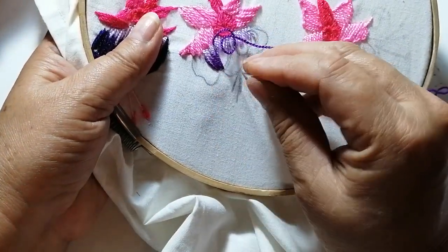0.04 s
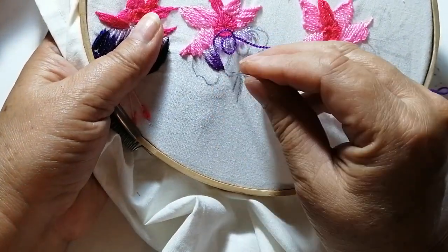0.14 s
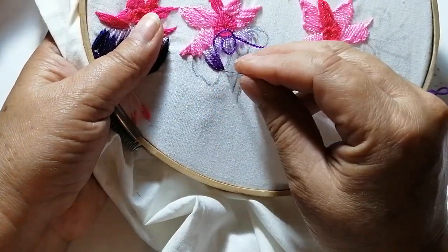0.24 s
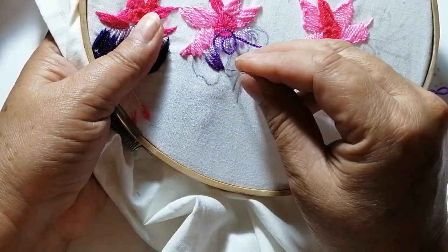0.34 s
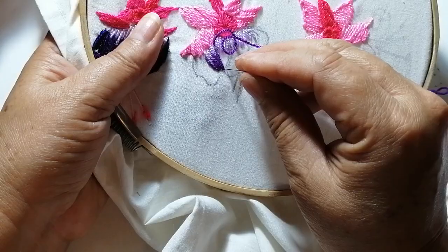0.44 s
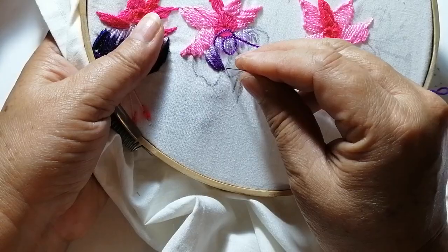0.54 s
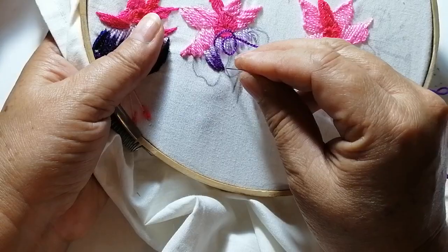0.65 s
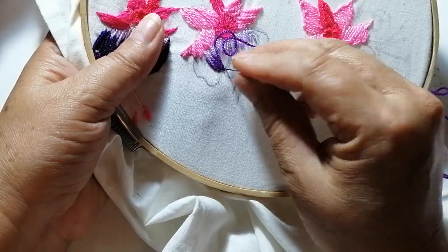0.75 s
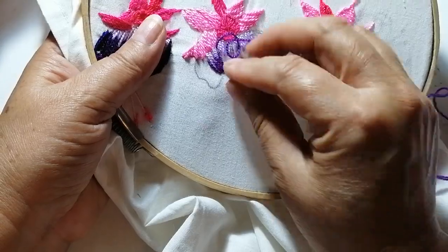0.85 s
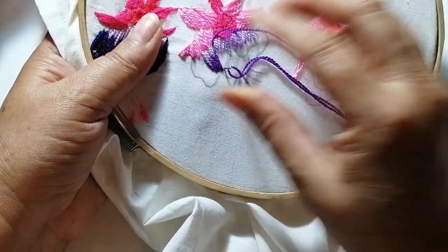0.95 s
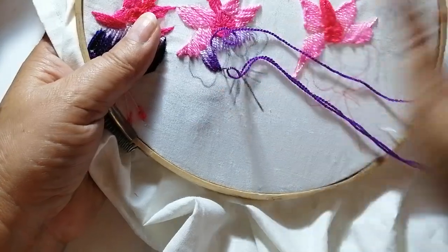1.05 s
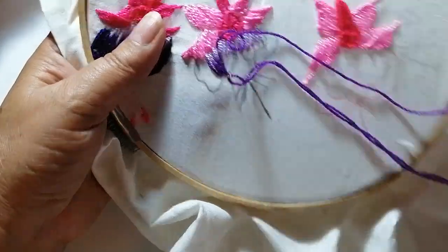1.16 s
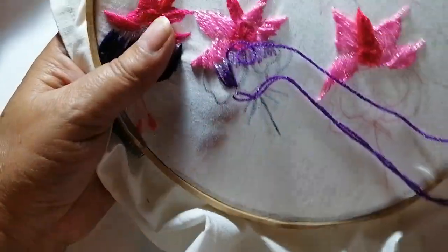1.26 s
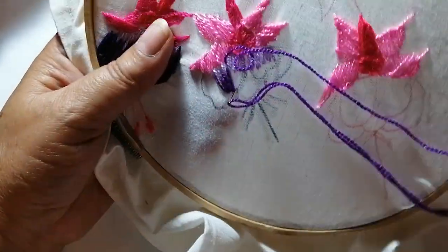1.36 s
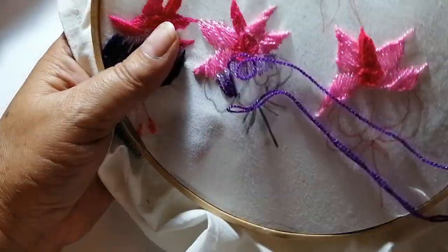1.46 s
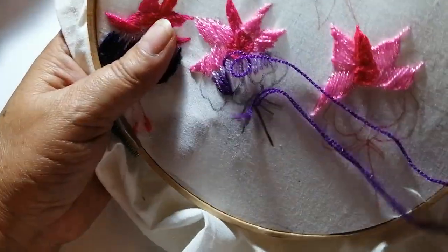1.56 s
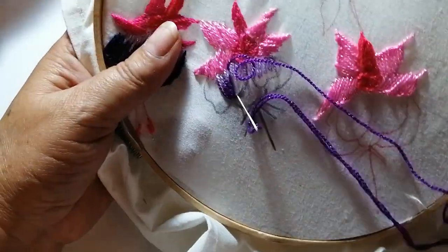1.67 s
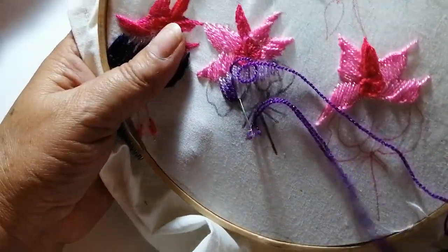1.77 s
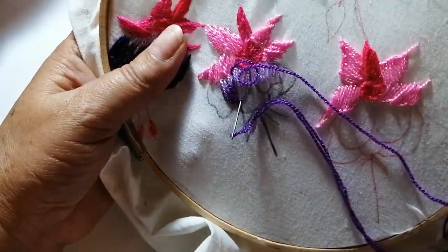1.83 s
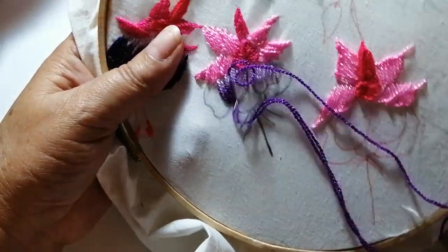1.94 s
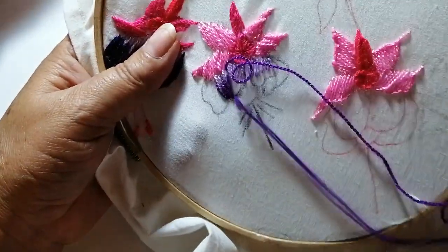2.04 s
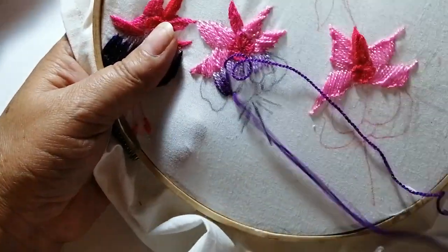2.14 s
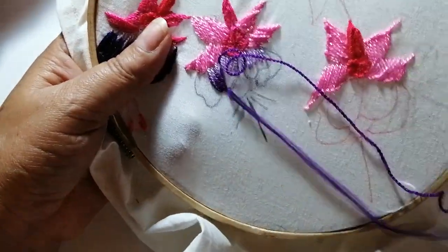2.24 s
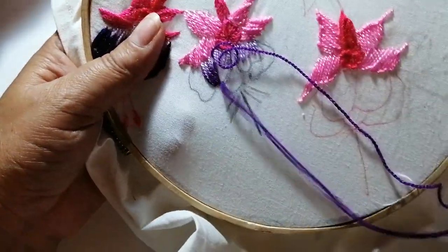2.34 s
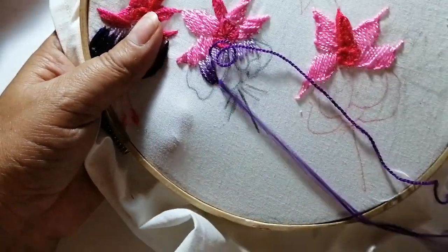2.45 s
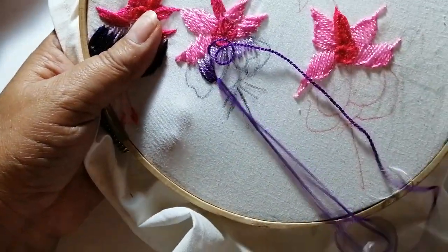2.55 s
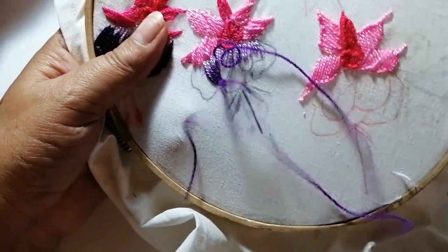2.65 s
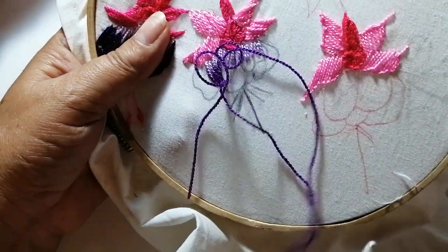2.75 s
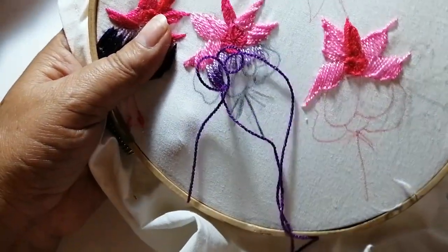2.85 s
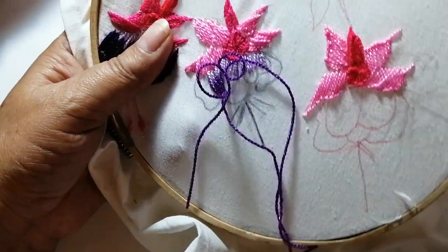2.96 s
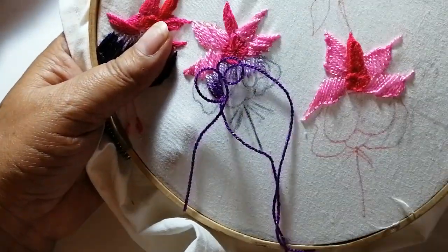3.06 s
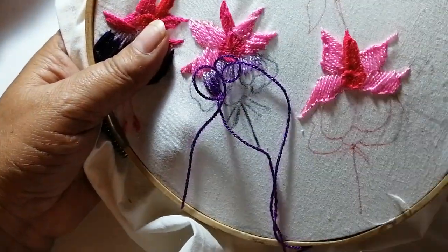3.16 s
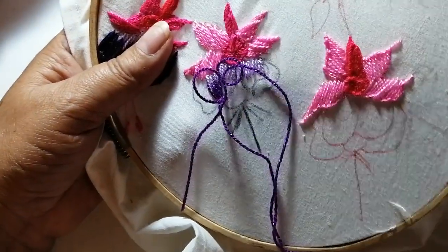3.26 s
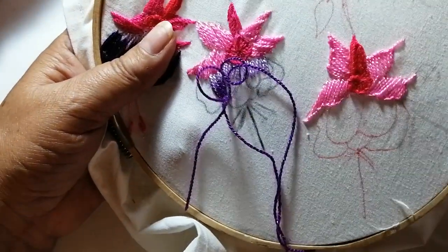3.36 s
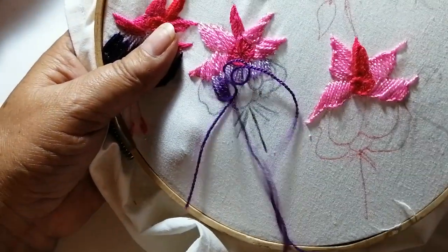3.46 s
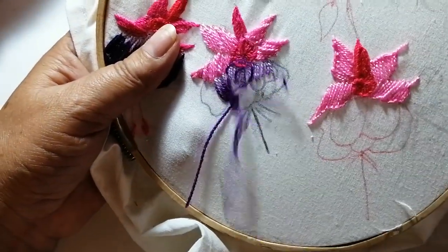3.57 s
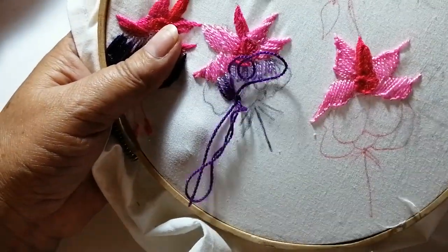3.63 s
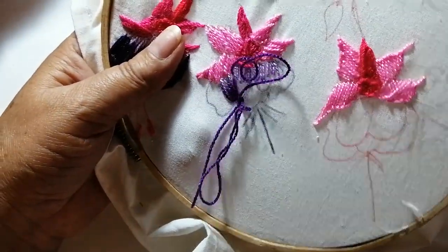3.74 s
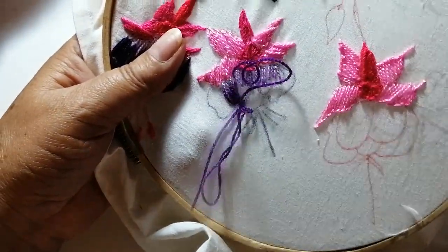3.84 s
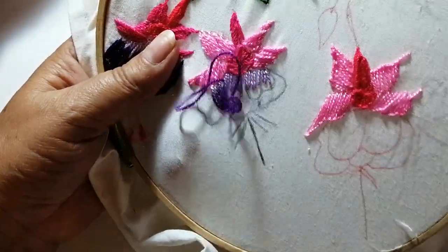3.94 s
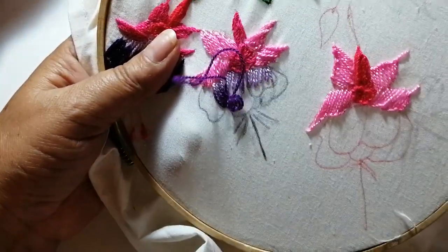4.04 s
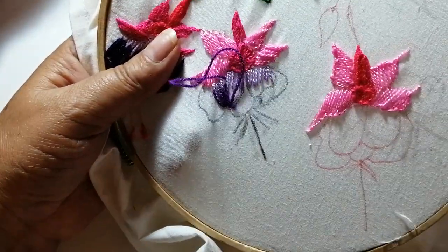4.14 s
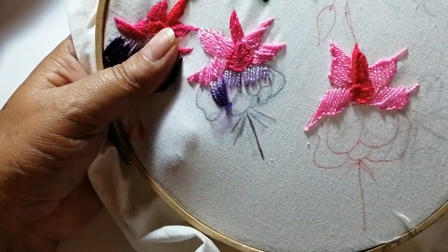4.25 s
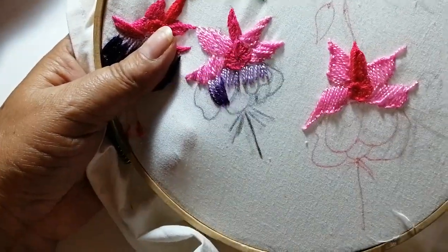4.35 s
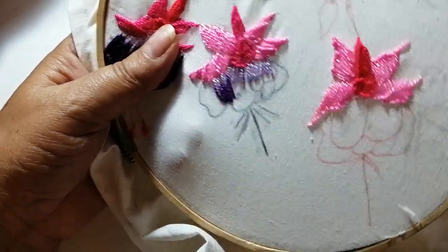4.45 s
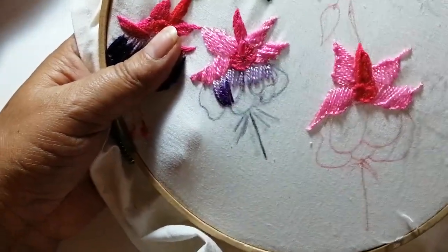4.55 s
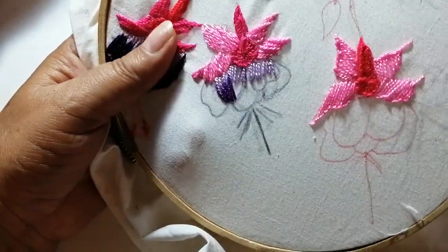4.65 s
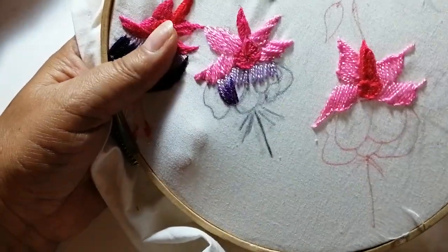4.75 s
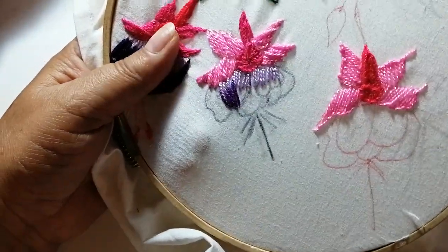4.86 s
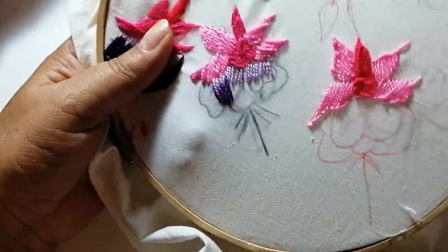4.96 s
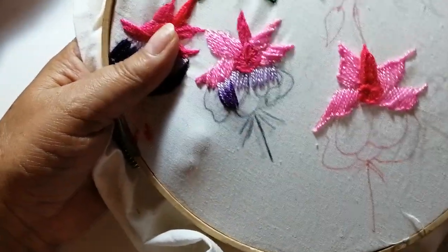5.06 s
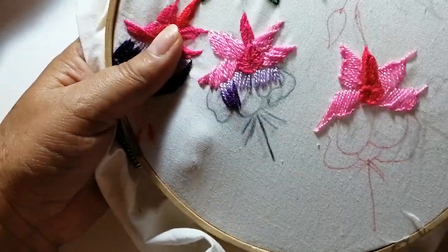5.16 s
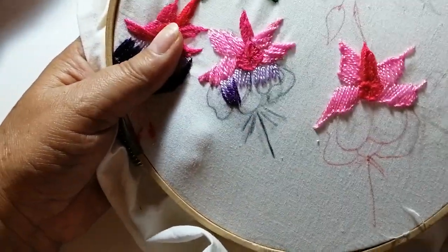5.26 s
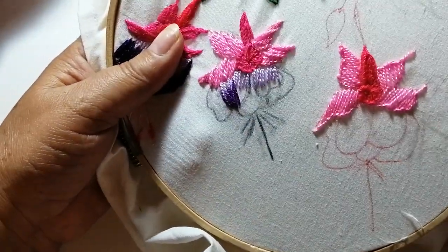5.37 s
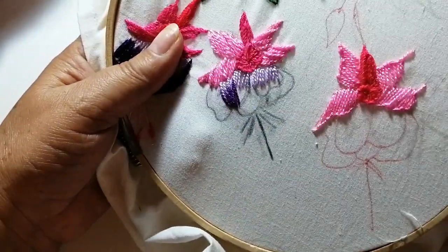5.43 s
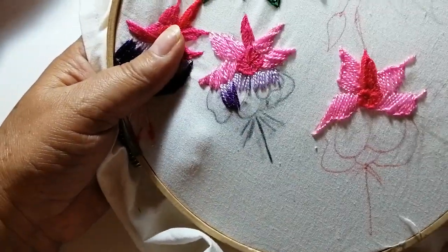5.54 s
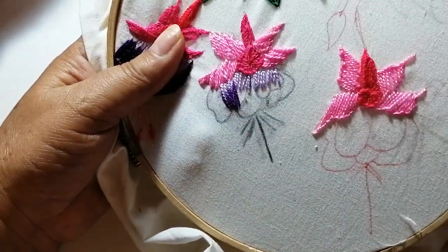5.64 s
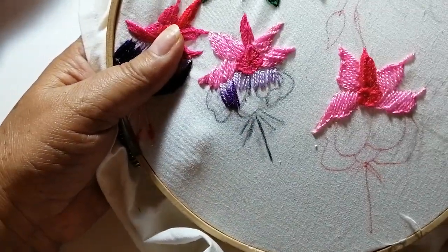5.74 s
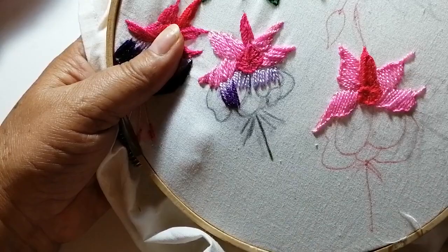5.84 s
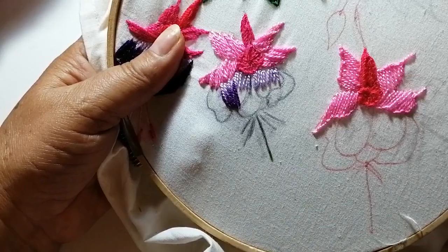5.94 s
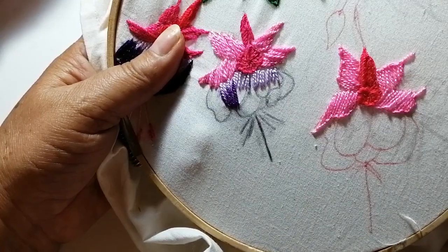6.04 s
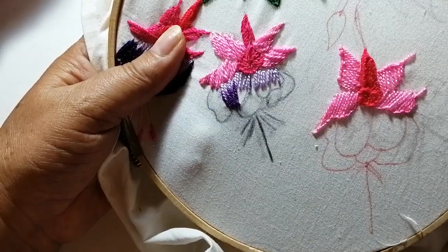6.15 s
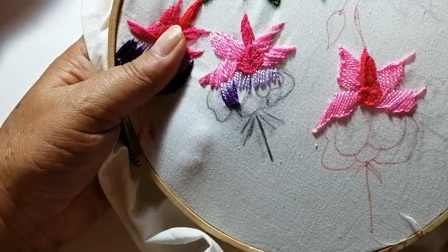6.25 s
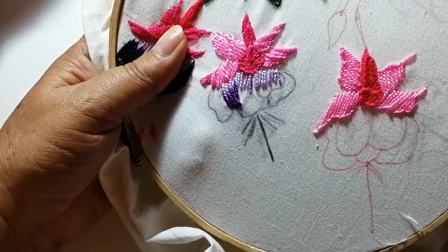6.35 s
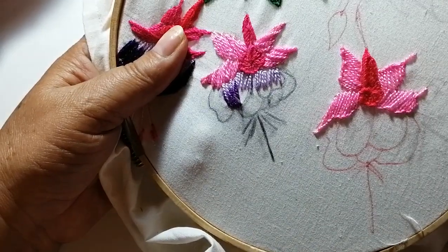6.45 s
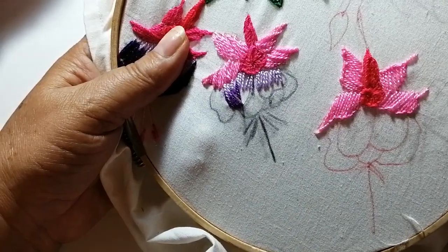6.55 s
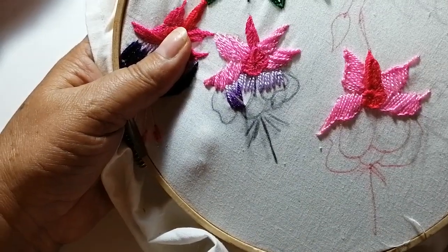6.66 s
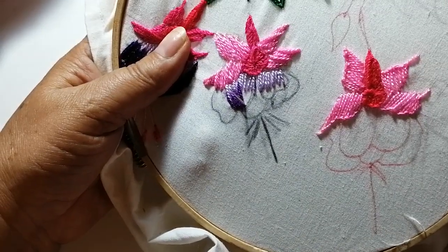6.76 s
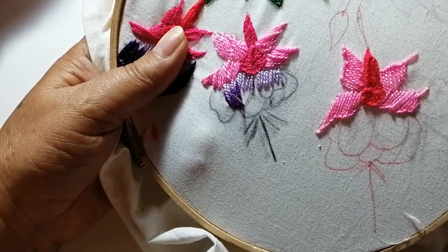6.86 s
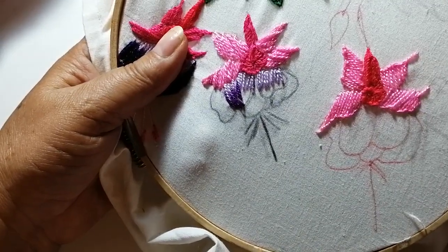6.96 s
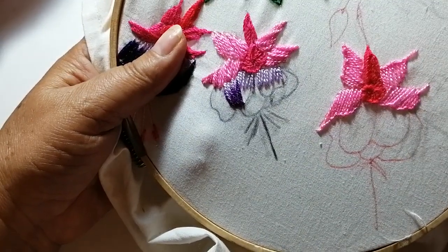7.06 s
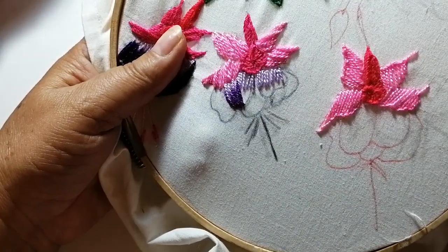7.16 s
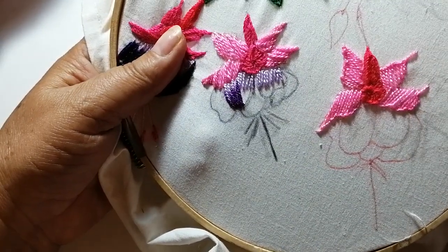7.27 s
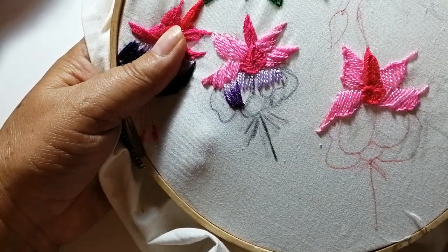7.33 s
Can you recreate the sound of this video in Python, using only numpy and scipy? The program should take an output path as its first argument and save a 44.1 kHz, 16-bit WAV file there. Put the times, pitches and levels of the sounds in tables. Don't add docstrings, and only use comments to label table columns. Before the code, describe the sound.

Very close stereo microphone in a small quiet room. Fingers brush cloth faintly, then a needle pops through fabric stretched in a hoop and thread rasps through for over half a second with a hollow drum-like ring. A shorter second stitch follows, ending in the hardest pop and a dragging thread tail. Later a few tiny crackling snags, then only low motor hum and soft hiss.

```python
import sys
import numpy as np
from scipy import signal
from scipy.fft import rfft, irfft, next_fast_len
from scipy.io import wavfile
from scipy.ndimage import uniform_filter1d

SR = 44100
rng = np.random.default_rng(int(sys.argv[2]) if len(sys.argv) > 2 else 0)


def transcribe(u):
    v = np.clip(np.atleast_2d(u).T, -1, 1)
    q = np.round(v * 32767).astype(np.int16)
    wavfile.write(sys.argv[1], SR, q)


def linear_from_db(decibels):
    return 10 ** (np.asarray(decibels, float) / 20)


N = 326340
TIME = np.arange(N) / SR


def evened(x):
    return x / np.sqrt(np.mean(x ** 2) + 1e-20)


def read(points, hz):
    f, value = np.transpose(points)
    return np.interp(np.log(hz + 1), np.log(f + 1), value)


def ring(modes):
    t = TIME[:8192]
    tap = np.zeros(len(t))
    for hz, width_hz, db in modes:
        decay = np.exp(-np.pi * width_hz * t)
        tap += linear_from_db(db) * width_hz * decay * np.cos(2 * np.pi * hz * t)
    b, a = signal.butter(2, modes[0][0] * 2 / 3, "high", fs=SR)
    tap = signal.lfilter(b, a, tap)
    return tap / np.linalg.norm(tap)


def strike(force, modes, soft_hz, swell_s=0):
    soft = signal.butter(2, min(soft_hz, 20000), fs=SR, output="sos")
    tap = ring(modes)
    if swell_s:
        tap = tap * (1 - np.exp(-(TIME[:len(tap)] / swell_s) ** 2))
    tap = signal.sosfilt(np.vstack([soft, soft]), tap)
    tap /= np.linalg.norm(tap)
    return signal.oaconvolve(force, tap)[:N], abs(tap).max()


def slips(per_s, spread_db):
    size = linear_from_db(spread_db * np.minimum(rng.exponential(1, N), 5))
    size = size * rng.choice([-1., 1.], N)
    return evened(size * (rng.random(N) < per_s / SR))


def noise(spectrum, likeness, patchy_db, flicker_db):
    frames, hz = N // 256 + 5, np.fft.rfftfreq(1024, 1 / SR)
    a, b, c, d, patches = rng.standard_normal((frames, 513, 5)).T
    patches = uniform_filter1d(patches, size=12, axis=0)
    patches = evened(uniform_filter1d(patches, size=12, axis=1))
    flicker = evened(uniform_filter1d(rng.standard_normal(frames), size=3))
    same = np.clip(likeness(hz), -1, 1)[:, None]
    left = a + 1j * b
    right = same * left + np.sqrt(1 - same ** 2) * (c + 1j * d)
    level_db = read(spectrum, hz)[:, None] + patchy_db * patches + flicker_db * flicker
    z = np.array([left, right]) * linear_from_db(level_db)
    return signal.istft(z, nperseg=1024, noverlap=768)[1][:, :N]


# (start [s], end [s], rub at start [dB], rub at end [dB], tautness [dB])
THREAD_PULLS = [ (0.774, 0.953, -72.5, -68, 6), (1.426, 1.608, -74, -70.5, 9),
                (1.928, 1.967, -67, -71.5, 12), (1.995, 2.006, -59, -42.5, -26),
                (2.04, 2.073, -48, -46.5, 9.5), (2.077, 2.182, -40.5, -37, 0),
                (2.185, 2.567, -40, -42.5, 2), (2.575, 2.695, -40.5, -41.5, 3.5),
                (3.314, 3.322, -50.5, -55, -13), (3.354, 3.436, -56.5, -67.5, 6),
                (3.448, 3.503, -60.5, -46, -7), (3.507, 3.54, -50.5, -47, -8),
                (3.55, 3.615, -43.5, -34, -2.5), (3.643, 3.671, -50.5, -53, 4),
                (3.67, 3.72, -46, -49.5, 5.5), (3.73, 3.824, -53.5, -70, 5),
                (3.965, 4.067, -33.5, -52.5, 5), (4.104, 4.204, -57, -49, -16),
                (4.221, 4.274, -48, -42, -15), (4.277, 4.31, -55, -52, -16),
                (4.313, 4.436, -48.5, -56, -17), (5.374, 5.49, -77, -69, 3), (5.534, 5.594, -59, -55.5, 0)]
# (frequency [Hz], width [Hz], level [dB])
UPPER_MODES = [(540, 44, -29), (667.5, 57, 6.5), (675.3, 44, 4), (715, 53, -8), (824, 79, 1), (902, 39, -3),
               (1012, 50, -17.5)]
DEEP_MODES = [(338, 40, -13), (400, 24, -11), (464, 42, 8)]
HIGH_MODES = [(1099.5, 18, 1.5), (1195, 68, 2), (1287, 98, 7), (1386, 60, 2), (1460, 36, -11),
              (1558, 27, -0.5)]
EDGE_MODES = [(1810, 60, -17), (1945, 64, 3.5), (2170, 80, -13), (2290, 36, -3), (2840, 210, -5.5),
              (3170, 340, -13.5), (3640, 195, -5.5)]
# (upper [dB], deep [dB], high [dB], edge [dB])
DRAG_SHIFT_DB = [0, -2, 4, -8]


def thread():
    grip_db_per_s, slack_db_per_s = 2503, 601.5
    group_db = np.array([0, -3, -10.5, -20.5])
    group_per_taut = np.array([0, 0.14, 0.4, 1.1])
    drag_start_s, drag_end_s = 4.11, 4.47
    levels = np.zeros((4, N))
    for start, end, start_db, end_db, taut_db in THREAD_PULLS:
        on = slice(round((start - .05) * SR), round((end + .15) * SR))
        t = TIME[on]
        rub_db = np.interp(t, [start, end], [start_db, end_db])
        rub_db -= grip_db_per_s * np.maximum(start - t, 0)
        rub_db -= slack_db_per_s * np.maximum(t - end, 0)
        stroke_db = group_db + group_per_taut * taut_db
        levels[:, on] = np.maximum(levels[:, on], linear_from_db(rub_db + stroke_db[:, None]))
    tight = (TIME > drag_start_s) & (TIME < drag_end_s)
    levels = levels * linear_from_db(np.outer(DRAG_SHIFT_DB, tight))

    shared = slips(per_s=1300, spread_db=2.5)
    groups = ((UPPER_MODES, 1500), (DEEP_MODES, 700), (HIGH_MODES, 1900), (EDGE_MODES, 4500))
    out = np.zeros(N)
    for level, (modes, soft_hz) in zip(levels, groups):
        force = evened(0.95 * shared + slips(per_s=4000, spread_db=0.5))
        out += strike(force * level, modes, soft_hz)[0]
    return out


# (time [s], peak [dB], deep modes [dB], scratch [dB], hoop thump [dB])
NEEDLE_POPS = [(0.782, -54, -12, -67, -76), (2.009, -52, -4, -73, -44), (2.0206, -17.5, 1.5, -60, -46),
               (3.32, -44, -16, -72, -64), (3.451, -55.5, 12, -80, -61), (3.543, -42.5, 12.5, -72, -56),
               (3.576, -53, -24, -59, -50), (3.6107, -29, -13, -51, -48), (3.6296, -21, -4, -69, -45),
               (3.644, -43, 1.5, -53, -47), (3.942, -16, -1, -27.5, -36.5), (4.0915, -31, 0, -70, -55),
               (4.2545, -30, -10, -57, -56), (5.012, -62, -6, -76, -47.5),
               (5.025, -51.5, -14.5, -61.5, -59)]
# (time [s], peak [dB], dull tick [dB], bright tick [dB])
FIBRE_SNAGS = [(1.216, -68, -64, -56.5), (2.097, -33.5, -66, -60), (2.121, -37, -70, -72),
               (2.475, -36, -69, -74), (2.499, -33, -70, -70), (4.158, -43, -84, -81),
               (4.434, -41, -78, -83), (5.5225, -44, -55.5, -66), (5.549, -39, -56, -62),
               (5.552, -63, -51.5, -62), (5.5643, -44, -58, -60), (5.5753, -38, -63, -68),
               (5.5807, -35.5, -52, -48), (5.5875, -54, -52, -52), (5.595, -39, -51, -46.5),
               (5.5995, -60, -52, -59), (5.869, -32, -46.5, -43.5)]
# (frequency [Hz], width [Hz], level [dB]); first, the cloth kicks the air
AIR_KICK = [(560, 650, 10.5), (2600, 2500, -21)]
LOWEST_MODES = [(233.6, 8.7, -2), (290, 40, -7.5)]
HOOP_MODES = [(85, 17, 13), (92.7, 22, 1.5), (123, 30, -6)]
FIBRE_CLICK = [(2080, 6600, -10), (7000, 6000, -12)]
DULL_TICK = [(2670, 600, 3), (3300, 2100, -2.5), (3900, 900, -2.5)]
STEEL_SNAP = [(5600, 1500, -4), (7200, 1400, 0), (9400, 1400, 1), (11300, 1500, -15)]


def needle():
    dull_db = 0.5
    snag_deep_db, snag_thump_db = -15, -43
    click_db = 9.5
    rows = []
    for s, db, deep, scratch, thump in NEEDLE_POPS:
        rows.append((s, db, deep, scratch + dull_db, scratch, thump))
    for s, db, tick, snap in FIBRE_SNAGS:
        rows.append((s, db, snag_deep_db, tick, snap, db + snag_thump_db))
    s, peak, deep, tick, snap, thump = np.transpose(rows)
    silent = np.full(len(NEEDLE_POPS), -140.)
    click = np.append(silent, click_db + np.transpose(FIBRE_SNAGS)[2])
    hard = peak + 0.59 * (peak + 12)

    # (level [dB], modes, softness [Hz], swell [s], gritty scratch)
    parts = (
        (hard + 8.5, AIR_KICK, 2400, 0, False),
        (peak - 6, UPPER_MODES, 1500, .0046, False),
        (peak - 17, HIGH_MODES, 2000, .0035, False),
        (click, FIBRE_CLICK, 10500, 0, False),
        (peak + deep - 4, LOWEST_MODES + DEEP_MODES, 900, .0042, False),
        (thump + 5, HOOP_MODES, 200, 0, False),
        (tick + 6, DULL_TICK, 5000, 0, True),
        (snap + 6, STEEL_SNAP, 9800, 0, True))
    at = np.round((s + .0015) * SR).astype(int)
    scratch = np.exp(-TIME[:400] / 0.00095)
    grit = 0.54 * rng.standard_normal(N)
    out = np.zeros(N)
    for db, modes, soft_hz, swell_s, gritty in parts:
        force = np.zeros(N)
        np.add.at(force, at, linear_from_db(db))
        if gritty:
            force = grit * signal.oaconvolve(force, scratch)[:N]
        sound, top = strike(force, modes, soft_hz, swell_s)
        out += sound / top
    return out


# (start [s], top [s], end [s], fine rustle [dB], coarse against fine [dB])
BRUSHES = [ (0.736, 0.855, 1.45, -83, 5.5), (1.04, 1.098, 1.41, -76.5, 3), (1.377, 1.524, 1.81, -70.5, 2),
           (1.8, 1.954, 2.36, -87, 10), (2.854, 2.97, 3.23, -86.5, 7), (3.252, 3.343, 3.47, -69.5, 5.5),
           (3.477, 3.63, 3.66, -66, -11), (3.63, 3.707, 3.77, -72, -8), (3.753, 3.9, 4, -80, 2.5),
           (3.954, 3.969, 4.115, -66, 12.5), (4.13, 4.257, 4.44, -77, 7), (4.317, 4.42, 4.51, -82.5, 8),
           (4.566, 4.788, 5.04, -78.5, 2), (5.001, 5.04, 5.14, -79, 2), (5.066, 5.36, 5.45, -76, 3.5),
           (5.5, 5.6, 5.68, -74, 8.5), (5.87, 5.885, 6.07, -83.5, 12.5), (6.6, 6.71, 7.1, -90, 5),
           (6.817, 7.04, 8.1, -90, 7)]
# (frequency [Hz], level [dB per Hz])
FINE_SPECTRUM = [(2940, -15.5), (5000, -4.5), (6930, -2), (8350, -7), (9310, 0.5), (10700, -0.5),
                 (12600, -11), (13700, -25.5), (14800, -38)]
# (frequency [Hz], level [dB per Hz])
COARSE_SPECTRUM = [(500, -9.5), (1200, -7), (2500, -0.5), (4500, -12), (6500, -11.5), (9000, -22)]


def rustle():
    swell_db = 17.5
    slide_s = (2.15, 2.71)
    rise_db_per_s, stop_db_per_s = 84, 359
    edge_db = rise_db_per_s * np.maximum(slide_s[0] - TIME, 0)
    edge_db += stop_db_per_s * np.maximum(TIME - slide_s[1], 0)
    fine = linear_from_db(np.interp(TIME, slide_s, (-66.5, -70)) - edge_db)
    coarse = fine * linear_from_db(np.interp(TIME, slide_s, (3.5, 4)))
    for start, top, end, fine_db, coarse_db in BRUSHES:
        on = slice(round((start - .2) * SR), round((end + .2) * SR))
        before = (top - TIME[on]) / max(top - start, 1e-3)
        after = (TIME[on] - top) / max(end - top, 1e-3)
        away = np.maximum(before, after)
        swell = linear_from_db(fine_db - swell_db * away) * signal.windows.tukey(len(away), .2)
        fine[on] = np.hypot(fine[on], swell)
        coarse[on] = np.hypot(coarse[on], linear_from_db(coarse_db) * swell)

    grain = 17.0 + uniform_filter1d(abs(slips(per_s=300, spread_db=-3.5)), size=90)
    skin = noise(FINE_SPECTRUM, lambda hz: -.25 + 0 * hz, patchy_db=1.0, flicker_db=1.2)
    cloth = noise(COARSE_SPECTRUM, lambda hz: 0.035 + 0 * hz, patchy_db=1.8, flicker_db=-1.3)
    return linear_from_db(8.5) * fine * evened(grain * skin) + linear_from_db(3.5) * coarse * evened(grain * cloth)


# (frequency [Hz], phase by which left leads [rad])
PORT_LEAD = [(200, 0), (1500, 0.75), (2700, 1.27), (5000, 1.9), (15000, 0.86)]
# (frequency [Hz], left against right [dB])
PORT_LEVELS = [(60, 4.5), (500, 1.5), (1500, -1), (3000, 1), (7000, -0.5), (12000, 1)]


def ports(x):
    size = next_fast_len(N)
    hz = np.fft.rfftfreq(size, 1 / SR)
    left = linear_from_db(read(PORT_LEVELS, hz) / 2) * np.exp(.5j * read(PORT_LEAD, hz))
    return irfft(rfft(x, size) * np.array([left, 1 / left]), size)[:, :N]


# (delay [s], left [dB], right [dB])
FIRST_ECHOES = [
    (.0009, -36.5, -25.5),
    (.0034, -19.5, -23),
]


def echoes(x):
    taps = np.zeros((2, 512))
    taps[:, 0] = 1
    for s, *db in FIRST_ECHOES:
        taps[:, round(s * SR)] = linear_from_db(np.array(db))
    return signal.oaconvolve(x, taps, axes=1)[:, :N]


# (frequency [Hz], time to fall by 60 dB [s])
ROOM_DECAY = [(100, 0.12), (500, 0.21), (2000, 0.11), (6000, 0.14), (14000, 0.11)]


def room(x):
    taps = np.zeros((2, SR // 2))
    starts = np.arange(60, SR // 2 - 20, 20)
    at = starts + rng.integers(0, 20, (2, len(starts)))
    np.put_along_axis(taps, at, rng.choice([-1., 1.], at.shape), 1)
    hz, t, z = signal.stft(taps, SR, nperseg=256)
    build_up = 1 - np.exp(-t / 0.0042)
    decay = linear_from_db(-60 * t / read(ROOM_DECAY, hz)[:, None])
    tail = signal.istft(z * build_up * decay, SR, nperseg=256)[1]
    low = signal.butter(2, 900, fs=SR, output="sos")
    tail[1] += 0.67 * signal.sosfiltfilt(low, tail[0] - tail[1])
    return signal.fftconvolve(x[None], tail / np.linalg.norm(tail[0]), axes=1)[:, :N]


# (frequency [Hz], level [dB], waver [Hz])
MOTOR_TONES = [(118.56, -66, .05), (211.05, -71.5, .05), (355.3, -81, .79), (414.5, -76.5, .79)]
TONE_TRIM_DB = [0.2, 0.2, 0.2, 0.2]
# (time [s], level [dB])
MAINS_BUZZ = [
    (0, -1.5),
    (3.2, 0),
    (4.5, -10),
    (7.4, -13),
]


def hum():
    beat_hz, beat_top_s = 1.44, .87
    buzz = linear_from_db(np.interp(TIME, *np.transpose(MAINS_BUZZ)))
    buzz = buzz * np.exp(2j * np.pi * beat_hz * (TIME - beat_top_s))
    out = np.zeros((2, N))
    for k, (hz, db, waver_hz) in enumerate(MOTOR_TONES):
        waver = uniform_filter1d(rng.standard_normal((2, N)), size=4000)
        waver = evened(uniform_filter1d(waver, size=4000))
        level = linear_from_db(db + TONE_TRIM_DB[k] + 1.2 * waver[1])
        if k == 0:
            level = level * (1 + buzz)
        turn = 2 * np.pi * (np.cumsum(hz + waver_hz * waver[0]) / SR + rng.random())
        lead = 0.33 * rng.standard_normal()
        out += np.sqrt(2) * (level * np.exp(1j * (turn + np.array([[lead], [-lead]])))).imag
    return out


# (frequency [Hz], level [dB per Hz])
ROOM_RUMBLE = [(15, -19), (30, 13), (60, 13.5), (100, -1.5), (160, 5.5), (300, 0)]
# (frequency [Hz], level [dB per Hz])
MIC_HISS = [(460, -4), (653, -4.5), (1030, -7), (1390, -9), (1810, -9.5), (6070, -19.5), (15000, -31)]
# (frequency [Hz], correlation [-1 to 1])
AIR_LIKENESS = [(60, -0.017), (180, 0.7), (550, 0.37), (1650, -0.45), (4970, 0.31), (15000, -0.01)]


def air():
    x = noise(ROOM_RUMBLE + MIC_HISS, lambda hz: read(AIR_LIKENESS, hz), patchy_db=1.5, flicker_db=1.0)
    high = signal.butter(4, 500, "high", fs=SR, output="sos")
    above = signal.sosfilt(high, x.mean(0))
    return linear_from_db(-73) * x / above.std()


def scene():
    rub, pops = thread(), needle()
    near = ports(rub) + echoes(ports(pops))
    far = room(linear_from_db(-8) * rub + linear_from_db(-9.5) * pops)
    return near + far + rustle() + hum() + air()


def top_cut(x):
    return signal.sosfilt(signal.butter(12, 15680, fs=SR, output="sos"), x)


def record(dry):
    hz = [0, 11000, 12500, 14000, 15200, 15900, SR / 2]
    fade_db = [-0.5, -7.0, -7.5, -4.5, -7.5, -88, -90]
    capsule = signal.firwin2(255, hz, linear_from_db(fade_db), fs=SR)
    mix = signal.oaconvolve(dry, capsule[None], "same")
    return top_cut(mix)


dry = scene()
out = record(dry)
transcribe(out)
```